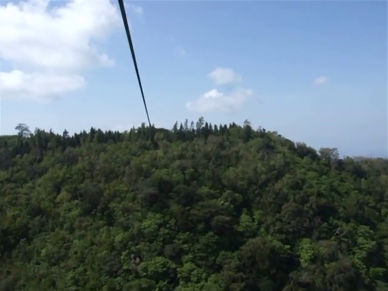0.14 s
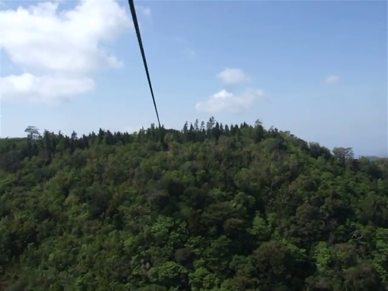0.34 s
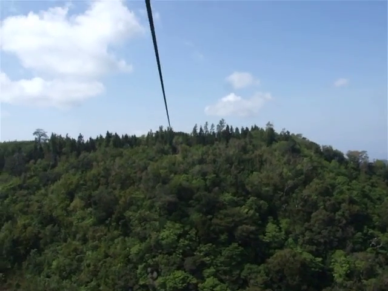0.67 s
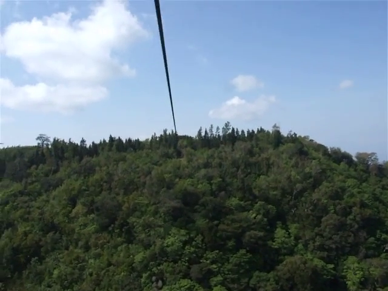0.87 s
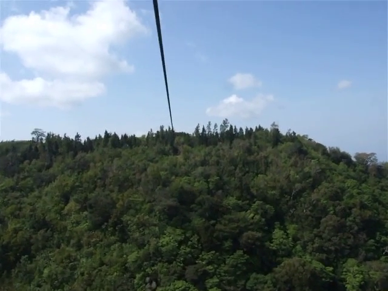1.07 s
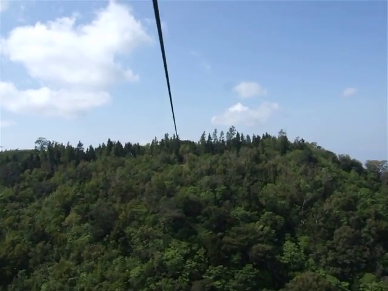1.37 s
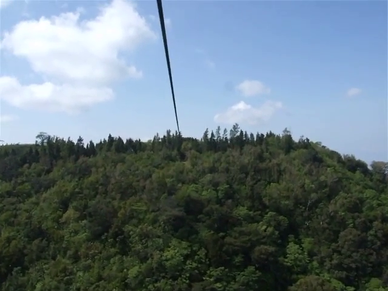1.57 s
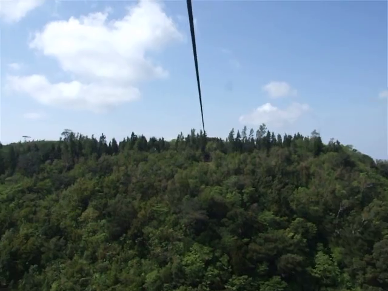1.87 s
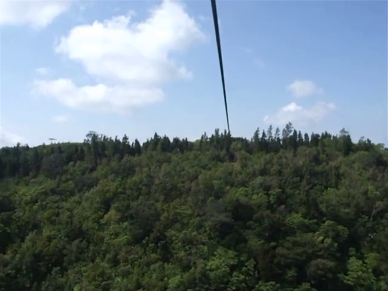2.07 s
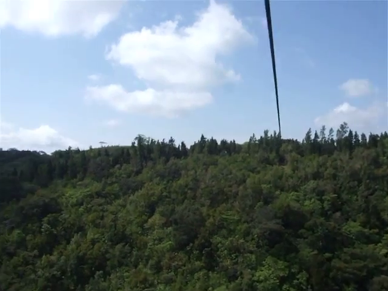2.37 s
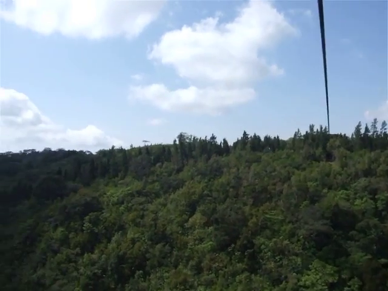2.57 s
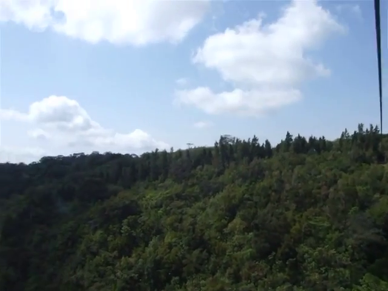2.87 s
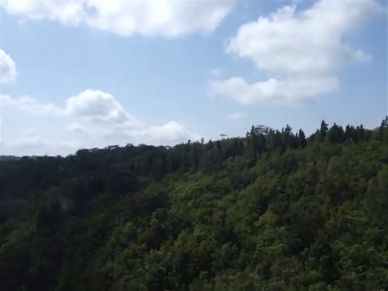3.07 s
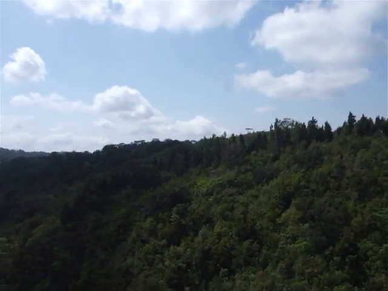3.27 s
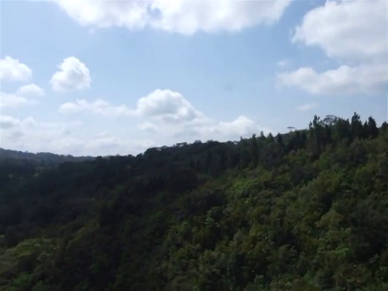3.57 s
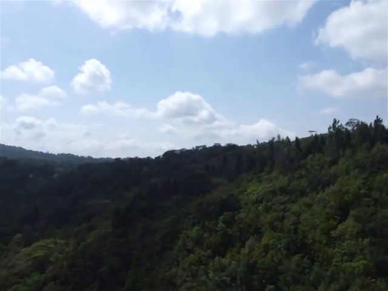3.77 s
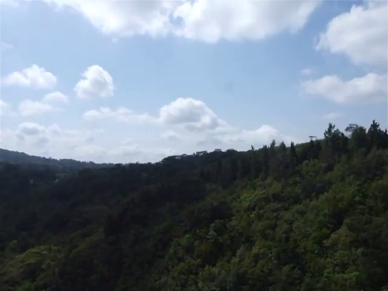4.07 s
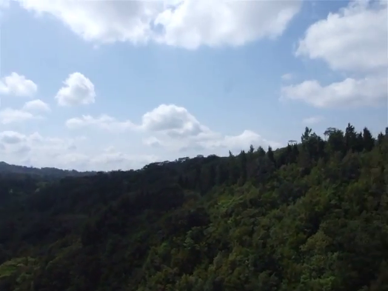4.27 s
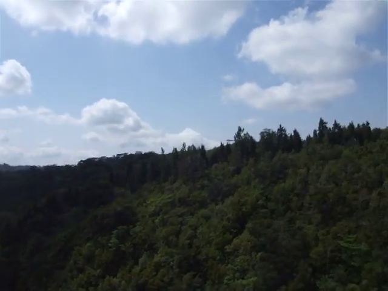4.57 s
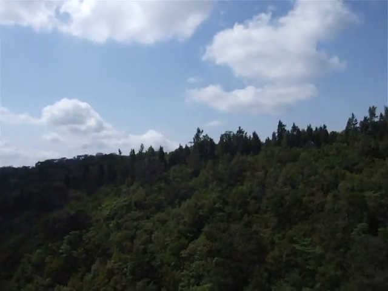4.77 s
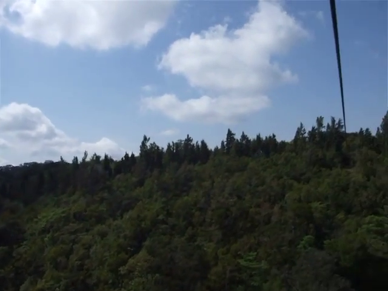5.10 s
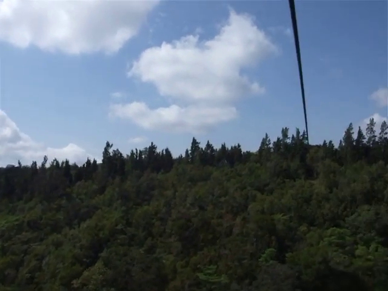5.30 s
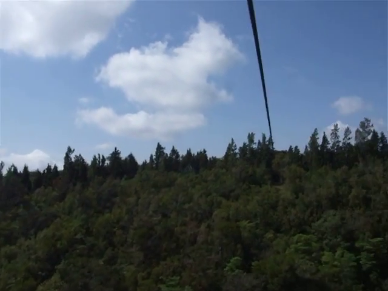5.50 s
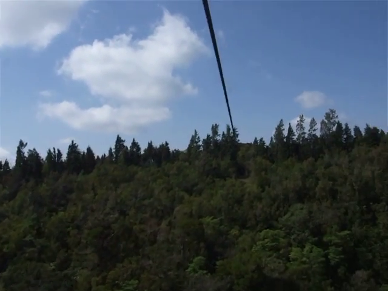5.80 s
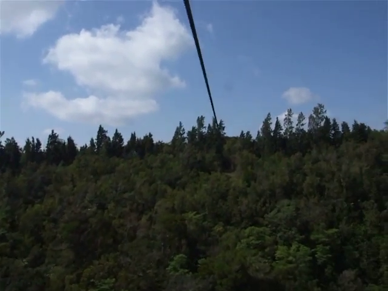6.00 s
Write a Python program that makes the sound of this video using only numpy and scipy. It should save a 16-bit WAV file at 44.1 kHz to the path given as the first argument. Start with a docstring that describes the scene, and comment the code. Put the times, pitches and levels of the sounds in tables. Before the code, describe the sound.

A zipline ride outdoors, heard from a microphone carried by the rider. From the start, deep wind buffets and heavy thumps hit the microphone, strongest in the first second, over the thinner high hiss of trolley wheels racing on a twisted steel cable. The rolling grows until about 2 s, a dense gritty sizzle with cable hiss and a ringing metal frame. Around 1.9 to 2.2 s the wind tears and snaps, then drops away by 2.5 s as the rider swings sideways. The sizzle now dominates, sharper and brighter, with a faint metallic whine slowly falling in pitch as the trolley loses speed. A mild gust passes near 3.9 s. At about 5.3 s wind bursts back, ragged and roaring with hard crackling snaps until about 5.9 s, then eases while the steady hiss runs on to the end at 6.1 s.

```python
"""A zipline trolley races along a twisted steel cable, slowly losing speed, miked close from the rider.
Its wheels strike the passing strands: noise gated by each bite gives a gritty high sizzle, the hiss of
the cable and a ringing frame; tones tied to the strand rate give a faint falling whine.
Wind noise buffets the microphone, eases while the rider swings sideways, and tears at it again near
the end; steep pressure flips snap at the port and slow damped swings thump."""
import sys
import numpy as np
from scipy import signal
from scipy.fft import rfft, irfft, next_fast_len
from scipy.io import wavfile
from scipy.ndimage import uniform_filter1d, map_coordinates

SR = 44100
rng = np.random.default_rng(int(sys.argv[2]) if len(sys.argv) > 2 else 0)


def unload_audio(sound):
    """Save the sound as a 16-bit wav file, at the path given as the first command line argument."""
    columns = np.transpose(np.atleast_2d(sound))
    # keep every value between -1 and 1, then stretch to whole-number steps
    steps = np.round(np.clip(columns, -1, 1) * 32767)
    wavfile.write(sys.argv[1], SR, steps.astype(np.int16))


N = 270949


def amp(db):
    """Decibels to gain."""
    return 10 ** (np.asarray(db) / 20)


def unit(x):
    """Scaled to rms 1."""
    return x / np.sqrt(np.mean(x ** 2) + 1e-20)


def clock():
    """The time of every sample in seconds."""
    return np.arange(N) / SR


def curves(rows):
    """One value per sample for each column after the time."""
    s, *columns = np.transpose(rows)
    return [np.interp(clock(), s, column) for column in columns]


def wobble(rate):
    """A smooth random curve, rate knots a second."""
    knots = rng.standard_normal(N // 8)
    return map_coordinates(knots, [clock() * rate], mode="wrap")


def filtered(x, response):
    """x times a response of frequency."""
    m = next_fast_len(N + SR // 2)
    spectrum = rfft(x, m) * response(np.fft.rfftfreq(m, 1 / SR))
    return irfft(spectrum, m)[:N]


def coloured(x, spectrum):
    """x shaped by (Hz, dB) points, joined on a log frequency scale, at rms 1."""
    f, db = np.transpose(spectrum)
    return unit(filtered(x, lambda hz: amp(np.interp(np.log(hz + 1), np.log(f), db))))


def noise():
    """Fresh white noise."""
    return rng.standard_normal(N)


def steadied(x, seconds):
    """x with its slow chance swells evened out."""
    power = np.abs(uniform_filter1d(x * x, int(seconds * SR) + 1))
    return x / np.sqrt(power + 0.014)


def strand_contact(strands, bite_db, uneven_db, scatter_db, chatter_db):
    """Contact force: one bite per strand, every other one harder, no two alike."""
    bite = bite_db * np.cos(2 * np.pi * strands) + uneven_db * np.cos(np.pi * strands)
    sizes = rng.standard_normal(N // 8)[np.round(strands).astype(int)]
    return amp(bite + scatter_db * sizes + chatter_db * wobble(110))


def wheel_sizzle(force, sizzle_db):
    """Steel wheels grind over the strands: high noise that follows the contact force."""
    # Each row: frequency in Hz, relative density in dB per Hz.
    sizzle_spectrum = [(3000, -42), (5200, -9), (5650, -7.5), (6050, -3), (6450, -2), (6850, 1), (7350, 1),
                       (7750, -6), (8000, -10), (8350, -15), (8700, -24.5), (9000, -40.5)]
    return amp(sizzle_db + 0.44 * wobble(13)) * coloured(force * noise(), sizzle_spectrum)


def grit(force, sizzle_db):
    """Only the hardest bites throw off the brightest ticks, so the force is raised to a steep power."""
    # Each row: frequency in Hz, relative density in dB per Hz.
    grit_spectrum = [(4500, -40), (6200, -11), (7200, 5.5), (7800, 6.5), (8300, -1.5), (8700, -10.5),
                     (9000, -29)]
    hardest = np.minimum(force, 4) ** 2.5 * amp(1.5 * wobble(70))
    under_sizzle_db = -8.5
    return amp(sizzle_db + under_sizzle_db + wobble(16)) * coloured(hardest * noise(), grit_spectrum)


def cable_hiss(force, cable_db):
    """The cable ahead rings long enough to smear the bites, so the force is flattened by a root."""
    # Each row: frequency in Hz, relative density in dB per Hz.
    cable_spectrum = [(1500, -42), (3500, -2.5), (4200, -2), (4700, 3.5), (5100, 3.5), (5400, -6.5),
                      (6500, 2), (9000, -36.5)]
    return amp(cable_db) * coloured(force ** .5 * noise(), cable_spectrum)


def frame_ring(force, rolling_db):
    """The shaken frame smears the bites too, in a lower and broader band."""
    # Each row: frequency in Hz, relative density in dB per Hz.
    frame_spectrum = [(300, -16), (1150, -20), (1600, -13.5), (2000, -9.5), (2400, -5.5), (3050, -5.5),
                      (3500, -2.5), (4000, 1), (4600, -3), (6500, -33)]
    return amp(rolling_db - 1.55) * coloured(force ** 0.41 * noise(), frame_spectrum)


def plate_ring(rolling_db):
    """Steady noise excites the side plates, each mode a resonance passed twice."""
    # Each row: mode in Hz, width of a single pass in Hz, relative gain in dB.
    plate_modes = [(2930, 35, 2), (3330, 380, -8.5), (3863, 94, 1.5), (5117, 110, 1)]

    def response(f):
        """Sum of the modes."""
        total = 0
        for centre, width, db in plate_modes:
            damping = 1j * f * width
            total = total + amp(db) * (damping / (centre * centre - f * f + damping)) ** 2
        return total

    return amp(rolling_db - 9.5) * unit(filtered(noise(), response))


def trolley(strands):
    """Wheels shake cable and frame; turning sideways brings the wheels forward and dims the cable."""
    # The ride grows over two seconds, then runs evenly. Each row: start in seconds, rolling level in dB.
    rolling_rows = [(0, -43.5), (.15, -40), (.62, -38), (.76, -41.5), (.97, -39.5), (1.45, -36),
                    (1.82, -35.5), (1.98, -33.5), (2.4, -32.5), (3.3, -33.5), (4.5, -33.5), (5.28, -32),
                    (5.6, -33.5), (6.14, -32.5)]
    # The rider swings round and back.
    # Each row: start in seconds, turn from 0 (facing along the cable) to 1 (furthest sideways).
    turn_rows = [(0, 0.055), (1.8, 0), (2.35, 0.51), (3.1, 0.81), (4.3, 1), (5.25, 0.7), (6.14, 0.53)]
    rolling_db, = curves(rolling_rows)
    turn, = curves(turn_rows)
    rolling_db = rolling_db + .3 * wobble(11)
    # level over the rolling, then the change at full turn
    sizzle_over_db, sizzle_turn_db = 4, 6
    cable_over_db, cable_turn_db = 5.3, -12.5
    waver_per_s, waver_db = 7.7, -0.02  # a negligible random waver of the sizzle level
    sizzle_db = rolling_db + sizzle_over_db + sizzle_turn_db * turn + waver_db * wobble(waver_per_s)
    cable_db = rolling_db + cable_over_db + cable_turn_db * turn ** 2
    force = strand_contact(strands, bite_db=4.5, uneven_db=1.5, scatter_db=0.7, chatter_db=0.04)
    wheels = wheel_sizzle(force, sizzle_db) + grit(force, sizzle_db)
    return wheels + cable_hiss(force, cable_db) + frame_ring(force, rolling_db) + plate_ring(rolling_db)


def whine(strands, waver_db, slip):
    """Rolling wheels sing at multiples of the strand rate; each tone swells and fades about its moment."""
    # Each row: multiple of the strand rate, rms level at the loudest in dB,
    # loudest moment in seconds, time from there to 3 dB down in seconds.
    wheel_tones = [(1.25, -65, 2.7, 0.7), (1.25, -71, 4.64, .6), (1.751, -60.5, 2.8, 0.7), (2, -59, 7, 3.8),
                   (2.751, -53.5, 2.4, 0.61), (3, -49, 4.34, 0.8), (3, -55, 1.7, 1.4), (3, -54.5, 6, 0.35),
                   (4, -48, 5.1, 0.45)]
    out = np.zeros(N)
    for multiple, db, loudest, lasting in wheel_tones:
        swell = 1 / np.sqrt(1 + ((clock() - loudest) / lasting) ** 4)
        phase = 2 * np.pi * multiple * strands + slip * multiple * wobble(45)  # slip in radians
        level = amp(db + waver_db * wobble(16))
        out += level * swell * np.sqrt(2) * np.sin(phase)
    return out


def airflow():
    """Levels of buffet, rush and tearing: all follow the wind; big eddies trade tearing for buffet."""
    # Air at the microphone. Each row: start in seconds, strength in dB, excess of big slow eddies in dB.
    wind_rows = [(0, -35, 14.5), (1.0, -33.5, 12.5), (1.62, -32.5, 11), (1.75, -31, 7), (2.16, -32, 3),
                 (2.25, -36, 7), (2.55, -45.5, 14.5), (3.1, -44.5, 9), (3.65, -40, 6.5), (3.87, -35.5, 6),
                 (4.25, -40.5, 6), (4.7, -44, 17), (5.2, -43, 13), (5.38, -27.5, 0), (5.78, -26, -0.5),
                 (5.92, -29.5, 2), (6.14, -33, 11.5)]
    # Short gusts on top. Each row: middle in seconds, rise of buffet and rush in dB.
    gust_rows = [(.01, 10.5), (.17, 4.5), (.68, 8), (.92, 3.5), (1.19, 2), (1.84, 0), (2.09, 4.5),
                 (2.42, 8), (5.41, 2.5)]
    gust_s = 0.027  # from a gust's middle until its rise in dB is down to 1/e
    strength_db, big_db = curves(wind_rows)
    strength_db = strength_db + 1.1 * wobble(14)  # chance unevenness
    gust_db = sum(db * np.exp(-((clock() - s) / gust_s) ** 2) for s, db in gust_rows)
    rush_db = strength_db + gust_db
    buffet_db = rush_db + big_db
    tear_db = strength_db + .35 * gust_db - 8.5 - 0.34 * big_db
    return buffet_db, rush_db, tear_db


def separated(tear_db):
    """0-1: the flow only tears once it is strong enough to separate from the housing."""
    separation_db = -50.5  # tearing level at the halfway point
    return 1 / (1 + amp(3.9 * (separation_db - tear_db)))


def wind(buffet_db, rush_db, tear_db):
    """Big eddies buffet the microphone port; small fast ones rush and tear in ragged spurts."""
    # Three spectra, low to high. Each row: frequency in Hz, relative density in dB per Hz.
    buffet_spectrum = [(5, -7.5), (15, -3), (28, 3), (48, -8.5), (70, -7.5), (90, -9), (125, -17),
                       (220, -29), (500, -71.5)]
    rush_spectrum = [(50, -24.5), (115, 3), (160, 1.5), (220, -2.5), (290, -5), (420, -11), (700, -20.5),
                     (1500, -49), (4000, -77.5)]
    tear_spectrum = [(150, -14), (300, 7), (520, 4), (800, -0.5), (1200, -5.5), (2000, -9), (3200, -36),
                     (7000, -42)]
    eddies = wobble(130)
    buffet = amp(buffet_db + 1.1 * wobble(18)) * steadied(coloured(noise(), buffet_spectrum), 0.12)
    rush = amp(rush_db) * steadied(coloured(noise() * amp(0.88 * eddies), rush_spectrum), 0.12)
    spurts = amp(2.6 * eddies + 3.8 * wobble(420))
    torn = steadied(coloured(noise() * spurts, tear_spectrum), .05)
    tear = amp(tear_db) * separated(tear_db) * torn
    return buffet + rush + tear


def thumps():
    """A heavy gust swings the diaphragm to and fro for a moment."""
    # Each row: start in seconds, peak of the envelope in dB, swing in Hz.
    heavy_gusts = [(0.01, -12.5, 38), (0.289, -9, 12), (0.684, -8, 18), (0.835, -14.5, 87), (0.92, -19, 86),
                   (1.172, -21, 44), (1.54, -13.5, 16), (1.82, -17, 21.6)]
    rise_s = 0.019  # time to the envelope's peak
    out, t = np.zeros(N + SR), np.arange(SR // 2) / SR
    age = t / rise_s
    envelope = age * np.exp(1 - age)
    for s, db, hz in heavy_gusts:
        out[round(s * SR):][:len(t)] -= amp(db) * envelope * np.sin(2 * np.pi * hz * t)
    return out[:N]


def snaps(tear_db, build, edge, decay, gain_db):
    """A passing eddy builds pressure, flips it steeply and lets it relax; lesser ones join the tearing."""
    # The hardest eddies at the port. Each row: start in seconds, kick in dB before the common gain.
    hard_eddies = [(0.184, -31), (0.234, -28), (0.326, -24.5), (0.516, -30), (0.685, -28), (1.117, -29.5),
                   (1.169, -27), (1.341, -27), (1.517, -27), (1.952, -19.5), (1.97, -23), (2.024, -30.5),
                   (2.072, -30), (2.175, -30), (5.333, -21), (5.378, -21), (5.389, -18.5), (5.401, -22),
                   (5.422, -20), (5.561, -21.5), (5.603, -18), (5.655, -19.5), (5.705, -19), (5.768, -18),
                   (5.779, -20), (5.943, -23.5), (6.065, -27), (6.104, -24.5)]
    # lesser snaps: rate in full tearing, mean kick over the tearing level, spread
    lesser_per_s, over_db, scatter_db = 28, 10, 2.5
    kicks, t = np.zeros(N), np.arange(SR // 20) / SR
    relax = np.exp(-np.abs(t - build) / decay)
    flip = np.tanh((t - build) / edge) * relax * np.minimum(t / build, 1)
    for s, db in hard_eddies:
        kicks[round(s * SR)] = amp(db)
    lesser = rng.random(N) < lesser_per_s / SR * separated(tear_db)
    kicks += lesser * amp(tear_db + over_db + scatter_db * noise())
    return -amp(gain_db) * signal.fftconvolve(kicks, flip)[:N]


def scene():
    """The trolley overhead and the wind at the microphone."""
    # The cable under the wheels. Each row: start in seconds, strands per second in Hz.
    speed_rows = [(0, 885), (1, 853), (2, 822), (3, 793), (4, 760), (5, 727), (6.14, 692)]
    strands = np.cumsum(curves(speed_rows)[0]) / SR  # strands passed so far
    ride = trolley(strands) + whine(strands, waver_db=2.5, slip=0.18)
    buffet_db, rush_db, tear_db = airflow()
    air = wind(buffet_db, rush_db, tear_db) + thumps()
    # times in seconds
    air += snaps(tear_db, build=0.001575, edge=.0001, decay=0.00056, gain_db=5.5)
    return (ride + air)[None]


def record(dry):
    """The rider's camera keeps nothing above its band limit: a very steep low-pass."""
    top_hz = 9080
    return filtered(dry[0], lambda hz: 1 / (1 + (hz / top_hz) ** 200))[None]


dry = scene()
out = record(dry)
unload_audio(out)
```